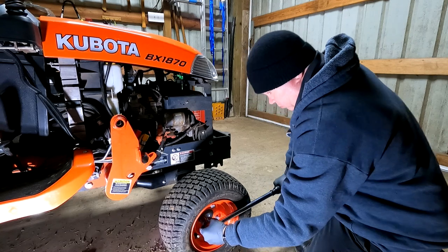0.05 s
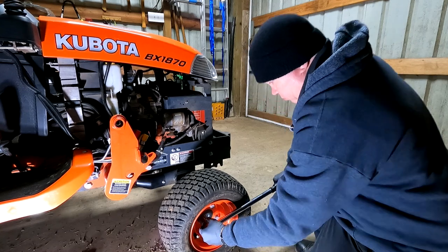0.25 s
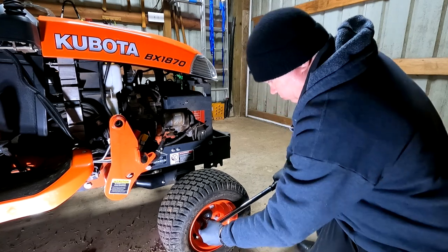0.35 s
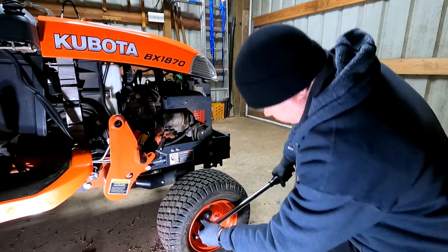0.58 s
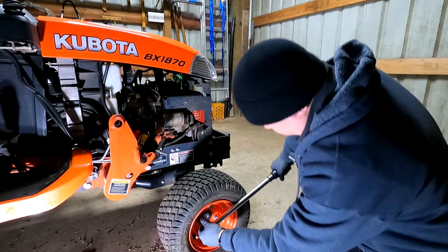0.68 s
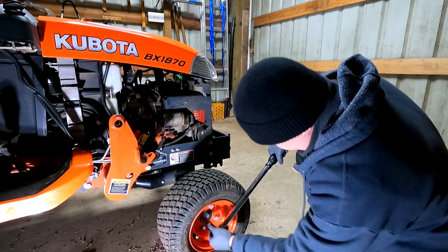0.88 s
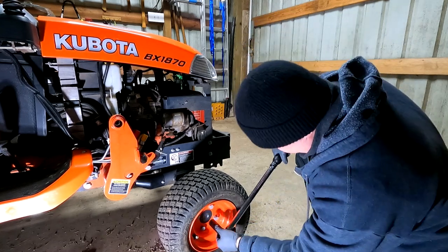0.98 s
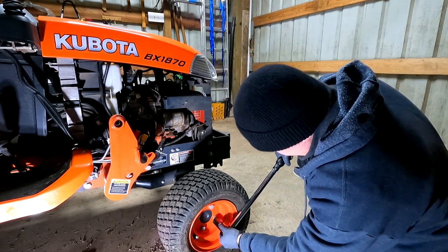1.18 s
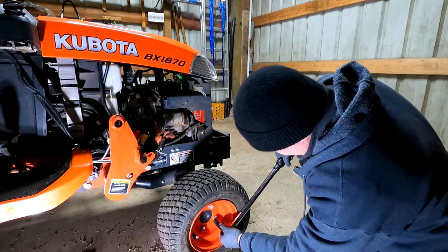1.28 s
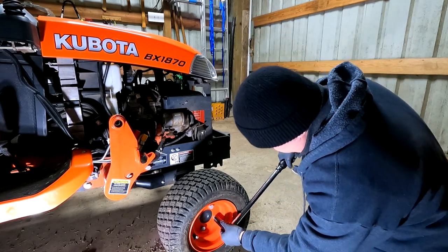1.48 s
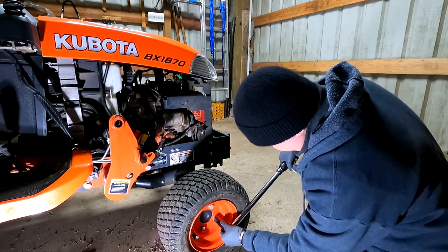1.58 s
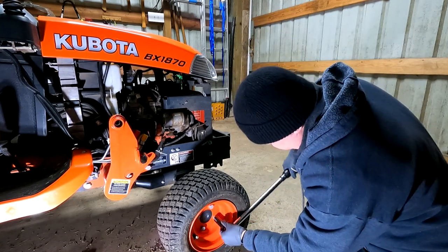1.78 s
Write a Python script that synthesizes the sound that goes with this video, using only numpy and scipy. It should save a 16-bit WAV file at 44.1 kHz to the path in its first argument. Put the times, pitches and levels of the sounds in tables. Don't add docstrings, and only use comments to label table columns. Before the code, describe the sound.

Close stereo pickup in a quiet shed: tiny creeping ticks, a hard wrench crack and a second snap, brief wheel ringing cut short, soft tyre bumps, a faint socket rattle, a dull knock and a firmer clack.

```python
import sys
import numpy as np
from scipy import signal
from scipy.io import wavfile

SR = 44100
rng = np.random.default_rng(int(sys.argv[2]) if len(sys.argv) > 2 else 0)


def wrap_up_sound(samples):
    columns = np.atleast_2d(samples).T
    tamed = np.clip(columns, -1, 1)
    steps = np.round(tamed * 32767).astype(np.int16)
    wavfile.write(sys.argv[1], SR, steps)


def invert_db(x):
    u = np.asarray(x, float) / 20
    return 10 ** u


N = 81585

# (frequency [Hz], level [dB per Hz])
FLOOR_COLOUR = [(25, -14), (75, -26), (150, -12.5), (383, -10.5), (786, -20.5), (1300, -10), (2900, -20.5),
                (5140, -15), (11700, -33), (14000, -46)]
# (time [s], level [dB])
STIRRING = [
    (0, -70),
    (.4, -64),
    (.75, -65.5),
    (1.05, -66),
    (1.35, -70),
    (1.5, -67.5),
    (1.85, -75.5),
]
# (time [s], peak level [dB], pitch [Hz])
TYRE_BUMPS = [(.0, -55, 154.4), (0.138, -50, 162), (0.629, -46, 305), (0.671, -45, 170), (0.79, -48, 172),
              (0.858, -46, 174), (.90, -41, 170), (0.95, -42.5, 226.5), (0.987, -45.5, 190),
              (1.188, -49.5, 170), (1.279, -50.5, 170), (1.361, -55, 170), (1.425, -47, 54.5),
              (1.747, -65.5, 201)]

# (time [s], peak level [dB])
NUDGES = [
    (.146, -56),
    (1.594, -46),
    (1.6062, -33),
    (1.613, -40),
    (1.622, -43),
    (1.6445, -29),
]
# (time [s], peak level [dB])
CREEPS = [
    (.1958, -44),
    (.2062, -30),
    (.2072, -32),
    (.2168, -18),
    (.2180, -19),
    (.2200, -27),
]
# (time [s], peak level [dB])
TRIP_BLOW = [
    (.2273, 4),
]
# (time [s], peak level [dB])
RESET_BLOW = [
    (.4206, 1.5),
]
# (time [s], peak level [dB])
DRAGS = [
    (.9884, -42),
    (.9905, -50),
    (.9925, -49),
    (.9945, -46),
    (.9965, -39.5),
    (1.0005, -47),
    (1.0135, -47),
]
# (time [s], peak level [dB])
RATTLES = [
    (.9756, -46),
    (.9775, -50),
    (.9942, -46),
    (.9977, -36),
    (.9988, -30),
    (1.005, -44),
    (1.0095, -43),
    (1.080, -55),
]
# (time [s], peak level [dB])
KNOCKS = [
    (1.4055, -44.5),
    (1.4159, -18),
    (1.4205, -32),
    (1.4275, -38),
    (1.4312, -30),
    (1.4362, -34.5),
]
# (time [s], peak level [dB])
SEATINGS = [
    (1.6392, -38),
    (1.6494, -10.5),
    (1.6506, -18),
    (1.6518, -26.5),
    (1.6548, -26),
    (1.665, -28),
    (1.7574, -38),
]

# (frequency [Hz], width [Hz], level [dB])
NUDGE_BODY_MODES = [(220, 90, 2), (390, 110, 0), (560, 200, -4), (900, 350, -8), (1800, 500, -24)]
CREEP_BODY_MODES = [(1000, 500, -4), (1800, 500, 0), (2800, 700, -1), (4000, 800, -1), (7900, 500, -14),
                    (7900, 70, 0), (11300, 300, -15), (12800, 300, -22)]
TRIP_BODY_MODES = [(975, 200, -1), (1790, 240, 1), (2450, 300, -4), (3300, 250, -9), (3960, 400, 0),
                   (4650, 280, -1), (6100, 400, -11), (7600, 440, -2), (8420, 290, -5), (10500, 200, -7),
                   (11100, 420, -6), (12000, 210, -12), (12900, 300, -14), (14900, 520, -18)]
RESET_BODY_MODES = [(940, 200, 2), (1950, 260, -2), (2400, 240, -5), (3690, 340, -2), (4830, 350, -2),
                    (5500, 300, -7), (6320, 210, -5), (6830, 200, -6), (7380, 230, -5), (8500, 400, -7),
                    (10300, 250, -6), (10900, 280, -1), (11900, 300, -10), (13100, 240, -10)]
DRAG_BODY_MODES = [(1150, 330, -2), (1910, 260, 2), (2470, 360, -4), (10300, 480, -19)]
RATTLE_BODY_MODES = [(920, 390, -6), (1980, 320, -3), (2440, 370, -21), (3580, 620, 6), (5170, 1200, -7),
                     (7030, 570, -4), (7850, 670, -7), (10500, 540, -30)]
KNOCK_BODY_MODES = [(300, 180, -0.5), (567, 150, 1), (946, 280, 3.5), (1530, 240, -6), (1855, 198, 0),
                    (2000, 300, -5), (4100, 520, -27), (6600, 990, -29.5), (7500, 140, -29),
                    (9500, 900, -43)]
SEAT_BODY_MODES = [(236.5, 48, 3.5), (406, 190, 0), (630, 370, 3), (994, 86, -2), (1534, 76, 1),
                   (2110, 440, 0.5), (2940, 300, -6.5), (3540, 220, -11), (4730, 510, -8), (6680, 740, -14),
                   (7090, 640, -8), (8600, 340, -19), (10500, 780, -27.5)]

# (frequency [Hz], level [dB], t60 [s])
TRIP_RING_MODES = [(56.03, -12.5, 0.18), (68.4, -8.5, 0.32), (112.6, -9.5, 0.39), (180, 7, 0.13),
                   (253.4, -4, 0.28), (289.3, -5.5, 0.35), (549, -14, .2), (10560, -7.5, 0.067)]
RESET_RING_MODES = [(50, -12.5, 0.54), (78.5, -4, 0.13), (125.5, -1.5, .22), (190, 9, 0.064),
                    (245.7, -12.5, 0.41), (264, -2, 0.04), (10820, -18, .05)]
# (frequency [Hz], level [dB], t60 [s])
DISC_MODES = [(774, -47, .5), (903, -37, .8), (945, -40, .8), (982, -37, .8), (1040, -41, .6),
              (2175, -44, .35), (2300, -42, .35), (2385, -46, .35)]

# (frequency [Hz], level [dB per Hz])
NUDGE_TAIL_COLOUR = [(120, -36), (350, 11), (800, 3), (1800, -44.5)]
TRIP_TAIL_COLOUR = [(30, -6.5), (80, -12), (240, -6), (380, -13), (600, -9), (1300, -14.5), (3000, -20),
                    (7800, -17.5), (9000, -28.5), (14000, -28)]
RESET_TAIL_COLOUR = [(30, -9), (80, -10.5), (240, -4.5), (600, -15), (1300, -16), (3200, -28),
                     (6500, -21.5), (9000, -32.5), (14000, -29)]
RATTLE_TAIL_COLOUR = [(300, -42), (1150, 11), (3460, 5.5), (13000, -22)]
KNOCK_TAIL_COLOUR = [(90, -40), (160, 8), (250, 4.5), (850, 3), (1900, -3), (2400, -26), (2900, -37),
                     (9000, -36)]
SEAT_TAIL_COLOUR = [(90, -27), (160, -3.5), (250, 1.5), (1400, -3.5), (2850, -16.5), (6000, -16.5),
                    (14000, -41)]
# (frequency [Hz], t60 [s])
SHED_DECAY = [(60, 0.46), (250, 0.52), (1000, 0.34), (4000, 0.52), (12000, 0.36)]
# (frequency [Hz], likeness [0-1])
LIKENESS = [(100, 1), (400, .93), (1500, 0.5), (5000, .7), (12000, 0.3)]
# (frequency [Hz], width [Hz], level [dB])
PANEL_MODES = [(952, 110, 0.5), (2240, 250, 0.5), (4750, 1400, 1), (7160, 450, 0.5), (11000, 600, 5)]


def rms_one(x):
    return x / np.sqrt(np.mean(x ** 2) + 1e-20)


def at_hz(points, hz):
    points_hz, values = np.transpose(points)
    return np.interp(np.log(hz), np.log(points_hz), values)


def filtered(x, kind, hz, order=2):
    return signal.sosfilt(signal.butter(order, hz, kind, fs=SR, output="sos"), x)


def resonance(x, hz, width_hz):
    r = np.exp(-np.pi * width_hz / SR)
    poles = [1, -2 * r * np.cos(2 * np.pi * hz / SR), r * r]
    return signal.lfilter(np.array([1, 0, -1]) * (1 - r * r) / 2, poles, x + 1e-18)


def ring(clicks, hz, t60):
    r = invert_db(-60 / (t60 * SR))
    w = 2 * np.pi * hz / SR
    return signal.lfilter([0, np.sin(w)], [1, -2 * r * np.cos(w), r * r], clicks + 1e-18)


def train(rows, delay_s=0):
    s, db = np.transpose(rows)
    clicks = np.zeros(N)
    clicks[((s + delay_s) * SR).astype(int)] = invert_db(db)
    return clicks


def banded_noise(spectrum, size, slower=None):
    edges = 30 * 2 ** (np.arange(28) / 3)
    t = np.arange(size) / SR
    white = rng.standard_normal((2, 2, size))
    out, power = 0, 0
    for k, (low, high) in enumerate(zip(edges, edges[1:])):
        mid, side = filtered(white[k % 2], "band", [low, high])
        hz = np.sqrt(low * high)
        alike = np.clip(at_hz(LIKENESS, hz), 0, 1)
        gain = invert_db(at_hz(spectrum, hz))
        power += gain ** 2 * 2 * (high - low) / SR
        dying_db = -60 * t / (slower * at_hz(SHED_DECAY, hz)) if slower else 0
        stereo = np.sqrt(1 + alike) * mid + np.sqrt(1 - alike) * side * [[1], [-1]]
        out = out + gain * invert_db(dying_db) * stereo
    return out / np.sqrt(2 * power)


def room_floor():
    stir_db = np.interp(np.arange(N) / SR, *np.transpose(STIRRING))
    return invert_db(stir_db + 2.5) * banded_noise(FLOOR_COLOUR, N)


def tyre_creak():
    hum_hz, hum_width_hz, hum_db = 170, 130, -71.5
    bump_t60_s, bump_swell_s = .14, .01
    hum = resonance(rng.standard_normal(N), hum_hz, hum_width_hz)
    hum = resonance(hum, hum_hz, hum_width_hz)
    out = invert_db(hum_db) * rms_one(hum)
    for s, db, hz in TYRE_BUMPS:
        age = np.maximum(np.arange(N) / SR - s, 0)
        swell = 1 - np.exp(-age / bump_swell_s)
        out = out + invert_db(db - 60 * age / bump_t60_s) * swell * np.sin(2 * np.pi * hz * age)
    return out


def contact(rows, body, damping):
    spread_s = .0009
    out = 0
    for k, (hz, width_hz, db) in enumerate(body):
        clicks = train(rows, spread_s * rng.random())
        struck = ring(clicks, hz, 2.2 / (damping * width_hz))
        swelling = resonance(struck, hz, 3 * width_hz)
        out = out + (-1) ** k * invert_db(db) * width_hz * swelling
    out = filtered(out, "high", 150)
    loudest_db = max(db for s, db in rows)
    return out * invert_db(loudest_db) / np.abs(out).max()


def shed(rows, spectrum, tail_db, slower):
    build_up_s, merged_s = .00067, .03
    size = int(.8 * SR)
    tail = banded_noise(spectrum, size, slower) * (1 - np.exp(-np.arange(size) / SR / build_up_s))
    out = np.zeros((2, N + size))
    for s, db in rows:
        if all(abs(s - other_s) > merged_s or db >= other_db for other_s, other_db in rows):
            start = int(s * SR)
            out[:, start:start + size] += invert_db(db + tail_db) * tail
    return out[:, :N]


def snap(rows, body, free_s):
    landing_s, landed_db, crack_db = .0016, -11, -16.5
    (s, db), = rows
    age = np.arange(N) / SR - s
    hiss = filtered(rng.standard_normal(N), "high", 3000)
    crack = invert_db(db + crack_db) * (age > 0) * (age < free_s + landing_s) * hiss
    damped_db = landed_db * np.clip((age - free_s) / landing_s, 0, 1)
    out = (contact(rows, body, damping=.45) + crack) * invert_db(damped_db)
    return out - resonance(out, 1280, 300)


def wheel(rows, modes):
    push = train(rows[-1:], delay_s=.0035)
    out = 0
    for k, (hz, db, t60) in enumerate(modes):
        out = out + (-1) ** k * invert_db(-22.5 + db) * ring(push, hz, t60)
    return out


def drift(rate, size):
    r = np.exp(-80 * np.pi * rate / SR)
    slow = signal.lfilter([1], [1, -2 * r, r * r], rng.standard_normal(size // 40 + 2002))[2000:]
    return np.interp(np.arange(size) / 40, np.arange(len(slow)), rms_one(slow))


def disc():
    held_s, held_db_per_s, wobble_db = .58, 300, 4
    held_db = -held_db_per_s * np.maximum(np.arange(N) / SR - held_s, 0)
    out = 0
    for hz, db, t60 in DISC_MODES:
        reset_db = 6 if hz > 2000 else 0
        blows = train([(TRIP_BLOW[0][0], 0), (RESET_BLOW[0][0], reset_db)])
        out = out + invert_db(db + held_db + wobble_db * drift(60, N)) * ring(blows, hz, t60)
    return out


def panels(tail):
    rung = tail
    for hz, width_hz, db in PANEL_MODES:
        rung = rung + invert_db(db) * resonance(tail, hz, width_hz)
    return rung - 0.97 * resonance(rung, 1230, 380)


def socket_rattle():
    return (contact(DRAGS, DRAG_BODY_MODES, damping=1.0)
            + contact(RATTLES, RATTLE_BODY_MODES, damping=0.8)
            + shed(RATTLES, RATTLE_TAIL_COLOUR, tail_db=-24.5, slower=1.0))


def ports(near):
    left_lag, scatter_s, scatter_db = .25, .0012, -13
    taps = rng.standard_normal(256) * np.exp(-np.arange(256) / SR / scatter_s)
    upper_mids = filtered(near, "band", [1200, 5500])
    scattered = signal.lfilter(taps / np.linalg.norm(taps), [1], upper_mids)
    a = (1 - left_lag) / (1 + left_lag)
    direct = np.stack([signal.lfilter([a, 1], [1, a], near), near])
    return direct + invert_db(scatter_db) * scattered * np.array([[1], [-1]])


def pan(x, left_db):
    return invert_db(left_db * np.array([[.5], [-.5]])) * x


def scene():
    floor = room_floor() + tyre_creak()
    near = (contact(NUDGES, NUDGE_BODY_MODES, damping=0.4)
            + contact(CREEPS, CREEP_BODY_MODES, damping=0.93)
            + snap(TRIP_BLOW, TRIP_BODY_MODES, free_s=.0021)
            + snap(RESET_BLOW, RESET_BODY_MODES, free_s=.0034)
            + wheel(TRIP_BLOW, TRIP_RING_MODES) - wheel(RESET_BLOW, RESET_RING_MODES) + disc()
            + contact(KNOCKS, KNOCK_BODY_MODES, damping=1.2)
            + contact(SEATINGS, SEAT_BODY_MODES, damping=1))
    snap_tails = panels(shed(CREEPS, TRIP_TAIL_COLOUR, tail_db=-27.5, slower=0.36)
                        + shed(TRIP_BLOW, TRIP_TAIL_COLOUR, tail_db=-30.5, slower=1.67)
                        + shed(RESET_BLOW, RESET_TAIL_COLOUR, tail_db=-26, slower=1.207))
    around = (shed(NUDGES, NUDGE_TAIL_COLOUR, tail_db=-7, slower=0.088)
              + shed(KNOCKS, KNOCK_TAIL_COLOUR, tail_db=-20.0, slower=1.0)
              + shed(SEATINGS, SEAT_TAIL_COLOUR, tail_db=-25.5, slower=0.89))
    return ports(near) + snap_tails + around + pan(socket_rattle(), 2.5) + pan(floor, -5)


def roll_off(x):
    return signal.sosfilt(signal.butter(12, 21850, fs=SR, output="sos"), x)


def record(dry):
    knee = 6
    heard = filtered(dry, "low", 12500, order=6)
    mix = heard / (1 + np.abs(heard) ** knee) ** (1 / knee)
    return roll_off(mix)


dry = scene()
out = record(dry)
wrap_up_sound(out)
```